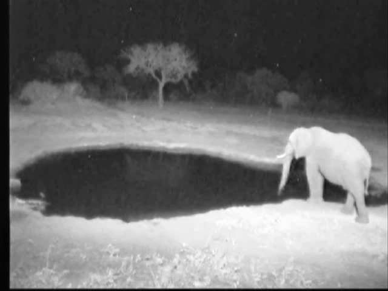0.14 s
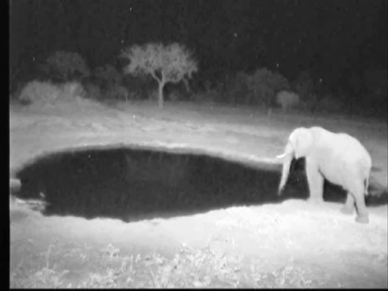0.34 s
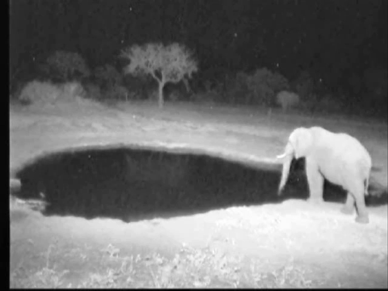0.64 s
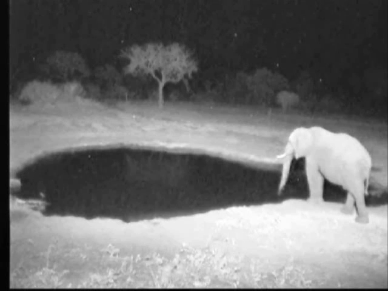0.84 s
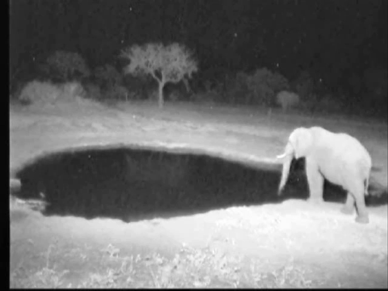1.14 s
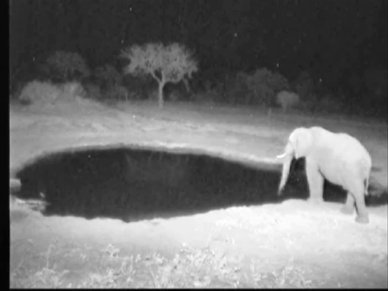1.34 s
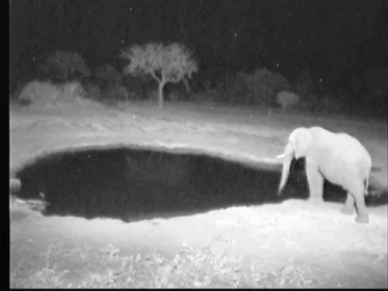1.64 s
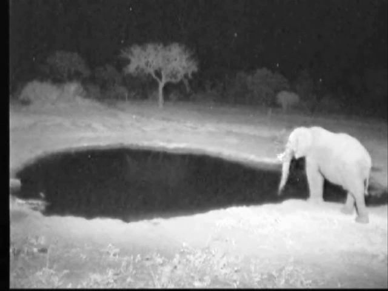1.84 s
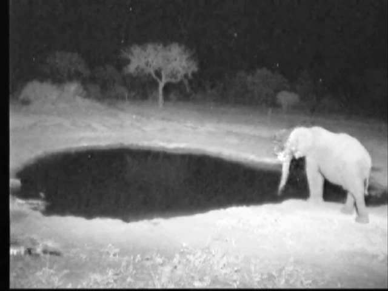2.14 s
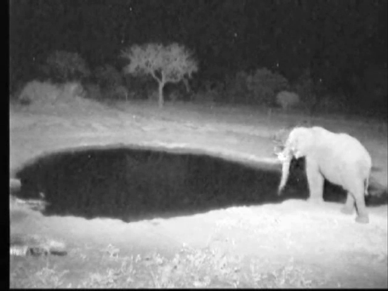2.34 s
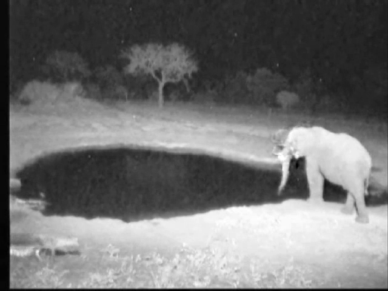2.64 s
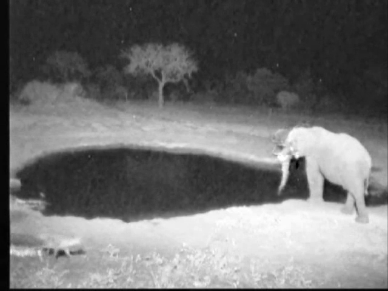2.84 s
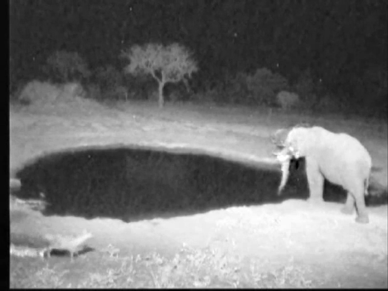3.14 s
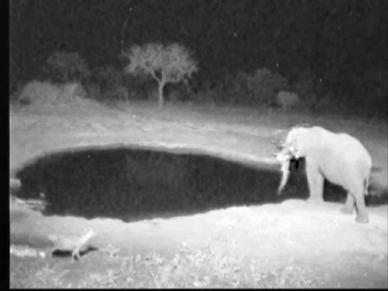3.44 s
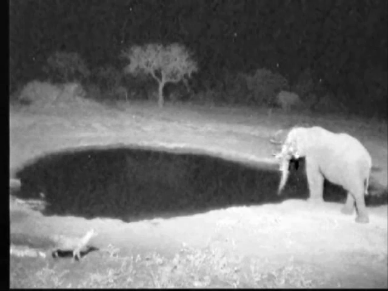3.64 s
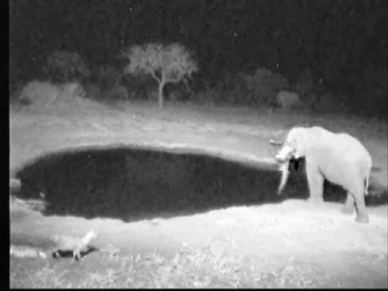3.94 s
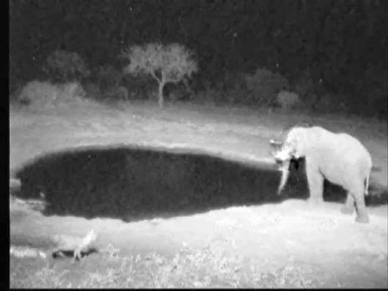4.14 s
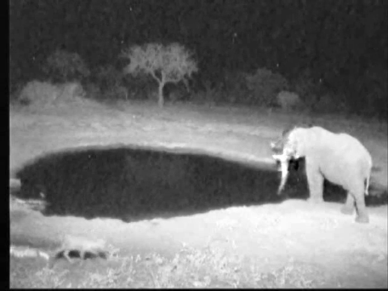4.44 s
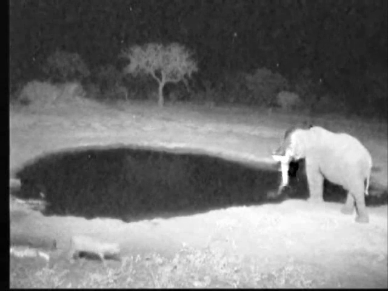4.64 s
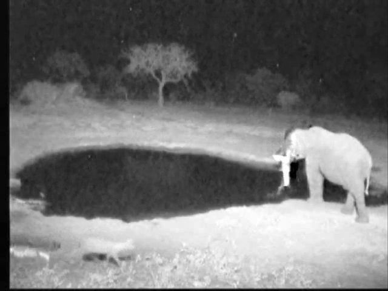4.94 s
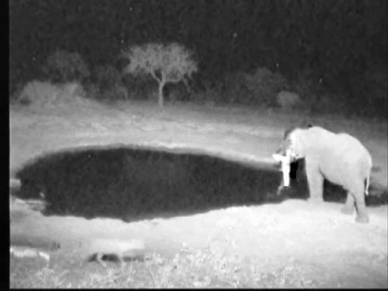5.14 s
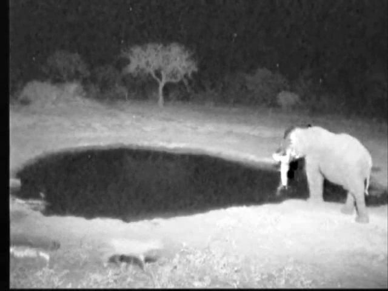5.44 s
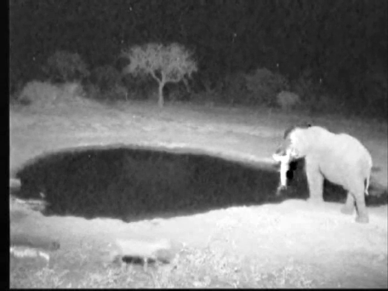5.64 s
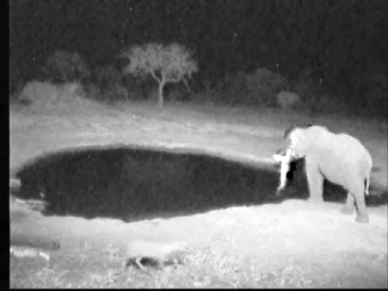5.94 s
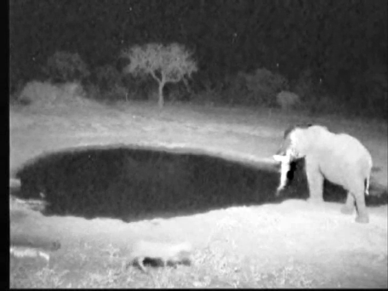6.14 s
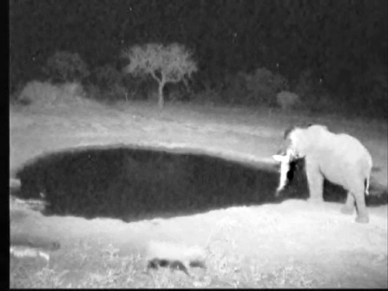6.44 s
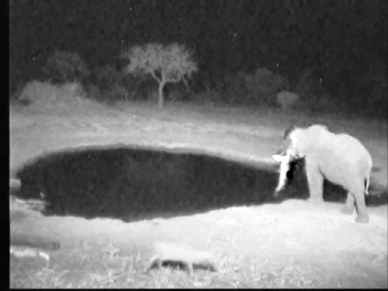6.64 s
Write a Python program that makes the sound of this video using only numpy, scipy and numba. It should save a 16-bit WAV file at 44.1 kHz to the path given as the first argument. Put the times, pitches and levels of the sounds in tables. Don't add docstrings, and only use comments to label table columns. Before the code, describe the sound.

An elephant slurps and gulps water up its trunk at a night waterhole, then water splashes and drips back over faint hum and hiss.

```python
import sys
import numpy as np
from scipy import signal
from scipy.fft import rfft, irfft, next_fast_len
from scipy.io import wavfile
from scipy.ndimage import uniform_filter1d
from numba import njit

SR = 44100
rng = np.random.default_rng(int(sys.argv[2]) if len(sys.argv) > 2 else 0)


def unload_wav(signal):
    wavfile.write(
        sys.argv[1],
        SR,
        np.round(np.clip(np.atleast_2d(signal).T, -1, 1) * 32767).astype(np.int16),
    )


def gain_from_db(level_db):
    decades = np.asarray(level_db, float) / 20
    return 10 ** decades


N = 299439
T = np.arange(N) / SR
MAINS_HZ, CLOCK_HZ = 49.942, 50.0


def unit(x):
    return x / np.sqrt(np.mean(x ** 2))


@njit
def svf(x, hz, width):
    y, band, low = np.empty(len(x)), 0., 0.
    for i in range(len(x)):
        g, k = np.tan(np.pi * hz[i] / SR), width / hz[i]
        v = (band + g * (x[i] - low)) / (1 + g * (g + k))
        band = 2 * v - band
        low += 2 * g * v
        y[i] = k * v
    return y


def steep_band(x, centre, width):
    return svf(svf(x, centre, width), centre, width)


def walk(rate):
    steps = np.repeat(rng.standard_normal(int(N * rate / SR) + 2), 8)
    steps = uniform_filter1d(uniform_filter1d(steps, size=8), size=8)
    return np.interp(T * rate * 8, np.arange(len(steps)), unit(steps))


def froth(crackle_db, patchy_db):
    grains = np.minimum(rng.exponential(size=N), 6)
    return unit(rng.standard_normal(N) * gain_from_db(crackle_db * grains + patchy_db * walk(90)))


def resonate(x, modes, wander, blotch_db, lowest_db, tilt_db):
    bands, power = np.zeros((2, 4, N))
    for k, (hz, width, db) in enumerate(modes):
        centre = hz * (1 + wander * walk(9))
        group = np.searchsorted([1500, 1950, 3050], hz)
        level = db + blotch_db * walk(22) + (k == 0) * lowest_db
        level = level + (group == 3) * tilt_db * np.log2(hz / 4800)
        gain = (-1) ** k * gain_from_db(level)
        bands[group] += gain * steep_band(x, centre, 1.5 * width)
        power[group] += gain ** 2 * width
    return np.array([unit(b) for b in bands / np.sqrt(power)])


def tint(db, colour_db, colours):
    usual_db = -28
    return np.array([[gain_from_db(db + base_db + share * colour_db + loud * (db - usual_db))]
                     for base_db, share, loud in colours])


def swells(events, colours):
    power = np.zeros((4, N))
    for s, db, rise, fall, colour_db in events:
        span = slice(max(int((s - 3 * rise) * SR), 0), int((s + 3 * fall) * SR))
        away = np.maximum((s - T[span]) / max(rise, .003), (T[span] - s) / max(fall, .003))
        shape = gain_from_db(-20 * away ** 1.39)
        power[:, span] += (tint(db, colour_db, colours) * shape) ** 2
    return power


def bursts(events, colours):
    power = np.zeros((4, N))
    for s, db, colour_db, held, t60 in events:
        i = int(s * SR)
        t = T[:min(SR // 4, N - i)]
        shape = np.minimum(t * 600, 1) * gain_from_db(-60 * np.maximum(t - held, 0) / max(t60, .003))
        power[:, i:i + len(t)] += (tint(db, colour_db, colours) * shape) ** 2
    return power


def bubbles(low_hz, high_hz, cycles, glide, count):
    out = np.zeros(N + SR)
    for when, pitch, size in rng.random((count, 3)):
        hz = low_hz * (high_hz / low_hz) ** pitch
        turns = np.arange(int(3 * cycles * SR / hz)) * hz / SR
        ring = np.sin(2 * np.pi * turns * (1 + glide * turns / cycles))
        ring *= np.minimum(turns / 2, 1) * np.exp(-turns / cycles * 2)
        out[int(when * N):][:len(ring)] += ring * -np.log(1 - size)
    return unit(out[:N])


# multiple of the mains pitch, level in dB.
MAINS_OVERTONES = [(1, -49.3), (3, -41.5), (5, -46.3), (7, -54), (9, -59), (11, -60), (13, -64)]
# multiple of the clock pitch, level in dB,
# moment in seconds when it opposes the mains.
CLOCK_OVERTONES = [(1, -49.8, 4.62), (2, -53.3, 0), (3, -53.4, 3.2), (5, -61, 3.8), (7, -64, 3.9)]


def hum():
    def mains_phase(k, t):
        return k * (2 * np.pi * MAINS_HZ * t - .93) + 5.2

    out = np.zeros(N)
    for k, db in MAINS_OVERTONES:
        out += gain_from_db(db) * np.cos(mains_phase(k, T))
    for k, db, s in CLOCK_OVERTONES:
        out -= gain_from_db(db) * np.cos(mains_phase(k, s) + 2 * np.pi * k * CLOCK_HZ * (T - s))
    return np.sqrt(2) * out * gain_from_db(.5 * walk(7.3))


# centre in Hz, width in Hz, level in dB.
TICK_BANDS = [(1070, 2700, -53.5), (3000, 1000, -53.5), (5500, 3000, -51.5)]


def ticks():
    spikes = np.zeros(N)
    at = np.arange(280, N, int(SR / CLOCK_HZ / 2))
    spikes[at] = gain_from_db(2.5 * rng.standard_normal(len(at)))
    return sum(gain_from_db(db) * unit(steep_band(spikes, hz + 0 * T, 1. * width)) for hz, width, db in TICK_BANDS)


# frequency in Hz, level in dB per Hz.
HISS_COLOUR = [(18, -32.5), (28, -17), (65, -10), (120, -11), (200, -14), (300, -10), (400, -11),
               (552, -8.5), (900, -15), (1570, -18), (2500, -15), (5180, -12.5), (6730, -14.5), (7600, -30)]


def night():
    hz, db = np.transpose(HISS_COLOUR)
    n = next_fast_len(N)
    f = np.maximum(np.arange(n // 2 + 1) * SR / n, 1)
    noise = rfft(froth(1.0, 0.2), n) * gain_from_db(np.interp(np.log(f), np.log(hz), db))
    band = np.floor(2 * np.log2(f / 20))
    air = sum(irfft(noise * (band == k), n)[:N] * gain_from_db(.9 * walk(7)) for k in range(18))
    insect = np.sin(2 * np.pi * 5052 * T + .6 * walk(12))
    insect *= gain_from_db(1.8 * walk(9) + np.interp(T, [0, 4.5, 5.8], [-58, -56, -52.5]))
    return unit(air) * gain_from_db(-40.5) + insect


# pitch in Hz, width in Hz, level in dB.
TRUNK_MODES = [(565, 125, 2), (895, 230, -3), (1270, 370, -7.5), (1700, 550, 0), (2297, 470, 3.5),
               (2774, 820, -4.5), (3300, 990, -8.5), (4070, 500, -1.5), (5025, 400, -4.5), (5720, 370, -4),
               (6580, 440, -4)]
# time in seconds, dB on its lowest resonance.
TRUNK_FILL = [(.25, 3), (.36, 5), (.55, 1), (.7, 3), (.8, 0), (.93, -5), (1.0, -9), (1.2, 1), (1.38, -7.5),
              (1.58, 0), (1.78, 1), (1.95, 1.5), (2.14, 4)]
# time in seconds, tilt of the top resonances in dB per octave,
# their level in dB.
TIP_PINCH = [(.33, -10, -2.5), (.5, -3, -1), (.55, -3, 0), (.6, 4, 0), (.67, -16, -.5), (.8, 10, 0),
             (.93, -8, -2), (1.07, 0, 0), (1.22, -10, -1), (1.45, -2, -1.5), (1.62, -6, -.5), (1.8, -3, 0),
             (2.15, 1, -1.5)]
# peak in seconds, level in dB, rise in seconds, fall in seconds
# (both span 20 dB), brightness in dB.
PULLS = [(.244, -36.5, 0.045, .06, -9), (.335, -27.5, 0.06, 0.15, -.5), (.495, -39, 0.044, 0.087, -0.5),
         (.57, -34.5, 0.06, 0.11, 5.5), (.675, -25.5, 0.06, 0.068, 1), (.73, -42, .03, 0.13, 6),
         (.845, -33, 0.048, 0.097, 7), (.935, -18.5, 0.057, 0.061, 3.5), (.972, -24, 0.092, 0.061, 7.5),
         (1.055, -47.5, 0.059, 0.17, 13), (1.215, -29, 0.064, 0.12, -7), (1.345, -27.5, 0.12, 0.22, -2),
         (1.445, -30, .1, 0.13, 8), (1.52, -24.5, 0.065, 0.24, -0.5), (1.63, -23, 0.25, 0.079, 2.5),
         (1.72, -35.5, .1, 0.23, 3.5), (1.82, -24.5, 0.21, .22, -1.5), (1.95, -30, 0.15, 0.25, 0),
         (2.148, -22, 0.11, 0.11, -7), (2.26, -40, 0.09, 0.11, -14), (2.33, -53, 0.045, .08, 12.5)]
# start in
# seconds, level in dB, brightness in dB, hold in seconds, time to fall 60 dB in seconds.
TRUNK_GULPS = [(.295, -44, 7.5, 0.0098, .06), (.5245, -25, -4.5, .013, 0.08),
               (.5475, -31, 15.5, 0.0026, 0.017), (.592, -52, 1, .012, .2), (.643, -29, -2, .004, .04),
               (.785, -28, 4.5, 0.022, 0.017), (.8045, -27.5, 9.5, 0.013, 0.024),
               (.828, -27, 3, 0.0018, .08), (1.0455, -38, 8, .0018, 0.095), (1.187, -38, -6, .02, 0.18),
               (1.3125, -29.5, 1, 0.0042, .02), (1.467, -22.5, -2, 0.0029, .03),
               (1.6185, -27, 2, 0.011, .015), (1.8, -28, -2.5, .011, 0.4), (2.276, -48, 4, .002, .2),
               (.392, -36, -4, .012, .04), (.895, -32, 2, .01, .05), (.923, -28, 2, .01, .04),
               (.955, -31, 10, .02, .06), (.69, -30, -3, .012, .03), (1.281, -32, -8, .012, .05),
               (1.433, -35, 8, .012, .06), (1.535, -31, -3, .01, .05), (1.563, -27, -8, .022, .05),
               (1.842, -31, -10, .02, .06), (1.915, -33, -4, .01, .05), (3.805, -35, -20, .035, .05)]
# dB when neutral,
# dB gained per dB of brightness, extra dB per dB of level.
PULL_COLOUR = [(-0.5, 0, 0), (-17, 1.03, .5), (-4, 1, -0.03), (-6.5, 1.22, -0.15)]
TRUNK_GULP_COLOUR = [(1.5, 0, 0.021), (-16, 1.2, .1), (-.5, 0.89, .05), (0, 0.74, .05)]


def slurp():
    foam = froth(1.6, 1.1)
    when, tilt_db, top_db = np.transpose(TIP_PINCH)
    fill_db = np.interp(T, *np.transpose(TRUNK_FILL))
    bands = resonate(foam, TRUNK_MODES, .022, 2.2, fill_db, np.interp(T, when, tilt_db))
    bands[3] *= gain_from_db(np.interp(T, when, top_db))
    bands[0] = unit(bands[0] + 0.5 * bubbles(520, 1400, 13, 0.017, count=600))
    bands[2] = unit(bands[2] + .3 * bubbles(2100, 2800, 16, 0.013, count=900))
    power = swells(PULLS, PULL_COLOUR) + bursts(TRUNK_GULPS, TRUNK_GULP_COLOUR)
    return np.sum(bands * np.sqrt(power), axis=0)


# start in seconds, peak in dB, ring in Hz.
SNAP_DROPS = [(0.5484, -4, 3570), (0.6443, -13, 2450), (0.8088, -3.5, 2610), (0.813, -8, 4500),
              (1.047, -9.5, 4500), (1.314, -11, 2500), (2.279, -23, 6300), (2.5854, -7.5, 6000),
              (2.8205, -6.5, 5000), (3.067, -21, 3000), (3.14, -12, 4600), (3.1562, -6, 5000),
              (3.194, -12, 4480), (3.505, -14, 3800), (3.6525, -9, 4800), (3.525, -24, 3500),
              (1.618, -9, 2300)]
# start in seconds, peak in dB, ring in Hz, width in Hz.
POCKET_DROPS = [(.533, -10, 720, 160), (.788, -16.5, 720, 120), (2.9, -27, 3900, 200),
                (2.65, -27, 4800, 200), (3.555, -25, 770, 130), (3.092, -17, 5250, 300),
                (3.093, -23, 6550, 300), (3.146, -25, 2460, 150), (3.171, -21, 2340, 150),
                (3.201, -24, 2400, 110), (3.224, -28, 2350, 70), (3.398, -24, 2170, 110),
                (3.644, -24, 784, 90), (3.645, -18.5, 2050, 80), (3.649, -14.5, 4610, 150),
                (3.79, -17, 574, 83), (3.959, -28, 3340, 80), (4.03, -26, 4800, 400),
                (4.103, -22, 5750, 250), (4.109, -24, 4700, 120), (4.113, -27, 4100, 120),
                (4.11, -28, 2000, 110), (3.968, -33, 4680, 30), (4.197, -30.5, 3300, 90),
                (4.305, -21, 4600, 100), (5.079, -46, 4650, 50), (3.646, -12, 6750, 250),
                (3.646, -17, 3280, 230), (3.7885, -12, 4200, 250), (3.806, -17, 4800, 300),
                (2.6, -20, 4200, 150), (2.602, -24, 3400, 150), (2.596, -12.5, 5100, 220),
                (.527, -15, 1004, 120), (3.504, -16, 6600, 250), (3.553, -22, 4650, 120),
                (1.313, -17, 4000, 300), (1.313, -16, 1070, 250), (.345, -23, 720, 50),
                (.663, -20, 1050, 80), (1.328, -21, 1020, 50), (1.8, -21, 560, 50), (1.805, -24, 1000, 90),
                (2.14, -22, 620, 40), (3.157, -18, 6500, 300), (3.4, -28, 6600, 200), (4.29, -37, 2000, 90),
                (2.718, -25, 4000, 200)]


def drops():
    out, t = np.zeros(N), T[:SR // 30]
    falls = [(s, db, hz, hz / 3.2) for s, db, hz in SNAP_DROPS] + POCKET_DROPS
    for (s, db, hz, width), noise in zip(falls, rng.standard_normal((len(falls), len(t) + 3))):
        crack = (noise[3:] - noise[:-3]) * np.exp(-t / 0.00046) * width / 6000
        ring = np.sin(2 * np.pi * hz * t) * np.exp(-np.pi * max(width, 30) * t)
        ring *= np.minimum(t * width * 3.5, 1)
        rough = 1 + .2 * unit(uniform_filter1d(noise[3:], size=90))
        drop = ring * rough + crack
        out[int(s * SR):][:len(t)] += gain_from_db(db) * drop / np.abs(drop).max()
    return out


# pitch in Hz, width in Hz, level in dB.
POOL_MODES = [(700, 500, -1.5), (1170, 300, -4), (1940, 660, 0), (2186, 270, -5.5), (2570, 440, -12.5),
              (3283, 370, 0), (4030, 550, 3), (4810, 350, 5), (5260, 360, 1), (5710, 380, -6),
              (6494, 590, 3.5)]
# time in seconds, tilt of the top resonances in dB per octave.
SPRAY_TILT = [(2.585, 15), (2.6, 1), (2.62, 0), (2.8, 0), (3.1, 0.5), (3.5, 0.5), (3.56, -3.5), (3.65, 8),
              (3.8, -10), (4.1, 2.5)]
# start in seconds, level in dB, weight in dB, hold in seconds,
# time to fall 60 dB in seconds.
SLAPS = [(2.585, -23.5, -33, .02, .017), (2.5985, -24, -24, 0.013, 0.028), (2.818, -16, -30.5, .006, 0.034),
         (2.8335, -27, -17.5, 0.0051, 0.12), (3.5525, -25, -10.5, 0.004, .026),
         (3.642, -22, -25, 0.0096, .02), (3.786, -24, -10, 0.018, 0.04), (3.8015, -25.5, -14, 0.0029, 0.22),
         (4.102, -41.5, -6, .01, .015), (4.192, -36, -22, .007, 0.13), (4.6915, -44.5, -1.5, 0.0056, .11)]
# start in seconds, level in dB, weight in dB, time to fall 60 dB in seconds.
SPRAY_SPITS = [(2.647, -31.5, -25, .05), (2.7165, -30.5, -17, .07), (3.0645, -34, -17, 0.11),
               (3.089, -31.5, -11.5, 0.12), (3.14, -30, -10, 0.068), (3.156, -19, -20, .015),
               (3.1705, -21, -19, .014), (3.198, -29, -18, 0.33), (3.397, -32, -7, 0.16),
               (3.4745, -36, -26, .015), (3.503, -28.5, -16, 0.043), (3.543, -27, -20, .042),
               (3.957, -36, -7.5, 0.15), (4.11, -29, -16, 0.12), (4.284, -36, -8, 0.15),
               (4.3045, -33.5, -22, 0.3), (4.417, -38, -25, 0.044), (5.06, -43, -4.5, 0.3)]
# peak in seconds, level in dB, rise in seconds, fall in seconds
# (both span 20 dB), weight in dB.
DRAINING = [(2.62, -29, .01, 0.079, -13.5), (2.68, -39, .05, 0.24, -12), (2.8, -35, .25, 0.057, -15),
            (2.853, -31, .01, 0.18, -17), (3.19, -32, 0.088, .12, -14), (3.235, -33.5, .05, .08, -16),
            (3.36, -47.5, .06, 0.15, 1), (3.43, -42.5, .03, 0.17, -3), (3.555, -30.5, .11, 0.11, -10),
            (3.662, -30, .01, 0.062, -11.5), (3.765, -31, .12, 0.055, -10), (3.85, -36, .01, 0.045, -2),
            (3.97, -42, .04, 0.24, -14), (4.13, -35.5, .01, .12, -10), (4.3, -45, .08, 0.11, -11),
            (4.45, -55.5, .12, 0.13, -15)]
# dB when neutral, dB gained per dB of weight, extra dB per dB of level.
DRAINING_COLOUR = [(1, 1.26, .05), (-5, .9, .05), (-2.5, 0.84, .05), (-3, 0, 0.053)]
SLAP_COLOUR = [(0.2, 0.86, .05), (-10, 0.5, 0.034), (-1, 0.6, 0.063), (1, 0.045, 0.0034)]


def splash():
    foam = froth(1.5, 1.8)
    bands = resonate(foam, POOL_MODES, .012, 1.5, 0, np.interp(T, *np.transpose(SPRAY_TILT)))
    bands[3] = unit(bands[3] + .28 * bubbles(3200, 6500, 14, .02, count=1800))
    trickle = gain_from_db(-64) * bubbles(3200, 6600, 45, .015, count=160)
    spits = [(s, db, weight_db, 0.0018, t60) for s, db, weight_db, t60 in SPRAY_SPITS]
    power = swells(DRAINING, DRAINING_COLOUR) + bursts(SLAPS + spits, SLAP_COLOUR)
    return np.sum(bands * np.sqrt(power), axis=0) + trickle


# middle in seconds, length in seconds, level in dB, pitch in Hz.
FAR_CHIRRS = [(4.7, .08, -48, 2200), (4.72, .12, -52, 3800), (5.17, .08, -58, 6400),
              (6.0, .16, -51.5, 4080), (6.35, .1, -50, 6100), (6.39, .1, -49, 3130),
              (6.44, .1, -48.5, 2920), (6.769, .05, -46, 3760), (4.51, 0.093, -45.5, 6550),
              (4.74, .1, -48, 4250), (4.65, .04, -47, 6750), (5.08, .08, -50, 2900), (3.19, .1, -43, 2350)]


def chirrs():
    out = np.zeros(N)
    for s, length, db, hz in FAR_CHIRRS:
        breath = steep_band(rng.standard_normal(N), hz + 0 * T, 170.)
        out += gain_from_db(db) * unit(breath) * np.exp(-(2 * (T - s) / max(length, .01)) ** 2)
    return out


def scene():
    mono = hum() + ticks() + night() + slurp() + drops() + splash() + chirrs()
    return np.tile(mono, (2, 1))


def narrow_link(x):
    top_hz, waver_hz, hole_db, spill_db = 7116, 110, -11.0, -25.5
    f, _, s = signal.stft(x, SR, nperseg=2048)
    power = uniform_filter1d(uniform_filter1d(np.abs(s) ** 2, size=3, axis=0), size=4, axis=1)
    hidden = power < uniform_filter1d(power, size=60, axis=0) * gain_from_db(hole_db) ** 2
    hidden &= f[:, None] > 1400
    treble = power[(f > 3000) & (f < 7000)].sum(axis=0)
    attack = treble > 2.5 * np.roll(treble, 2)
    waver = waver_hz * uniform_filter1d(rng.standard_normal(s.shape[1]), size=3)
    over = f[:, None] - top_hz - waver
    spill = gain_from_db(spill_db - 0.0026 * over) * attack
    return signal.istft(s * np.where(over > 0, spill, ~hidden), SR, nperseg=2048)[1][:N]


def top_cut(x):
    return signal.sosfilt(signal.butter(12, 8210, fs=SR, output="sos"), x)


def record(dry):
    link = narrow_link(0.79 * np.tanh(dry[0] / .8))
    return top_cut(np.tile(link, (2, 1)))


dry = scene()
out = record(dry)
unload_wav(out)
```